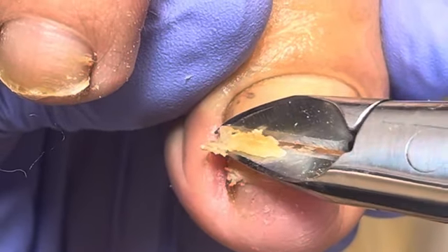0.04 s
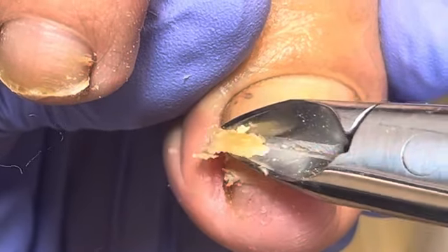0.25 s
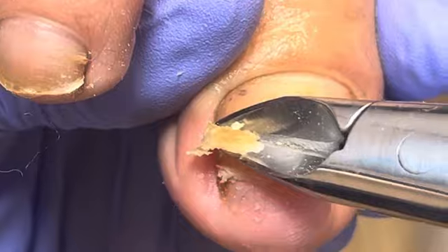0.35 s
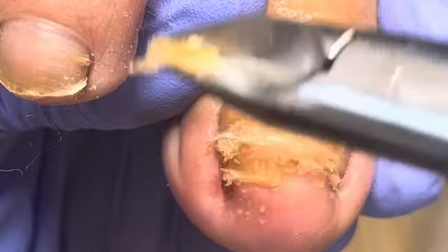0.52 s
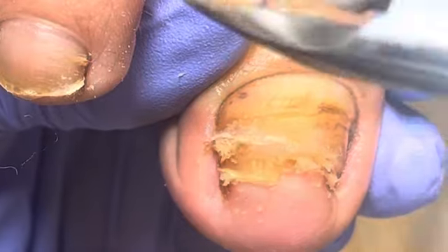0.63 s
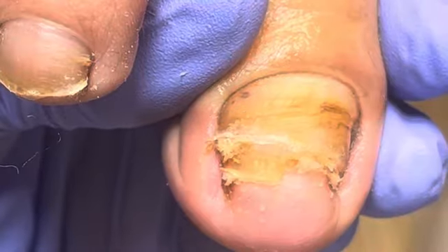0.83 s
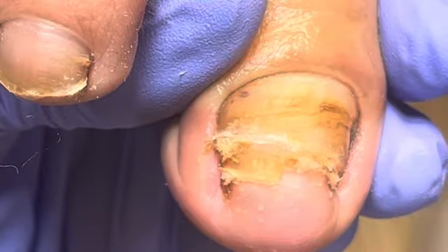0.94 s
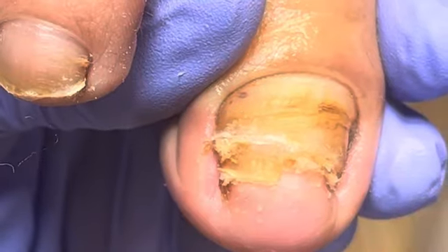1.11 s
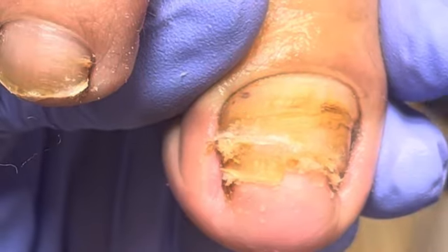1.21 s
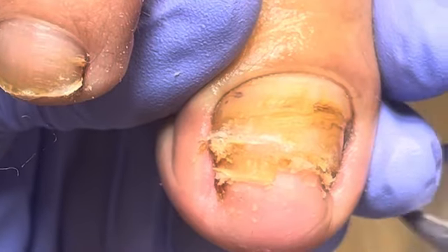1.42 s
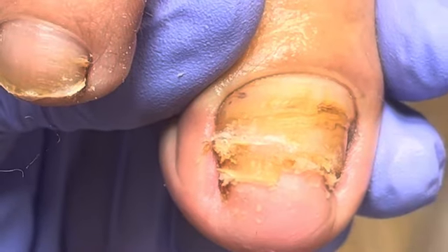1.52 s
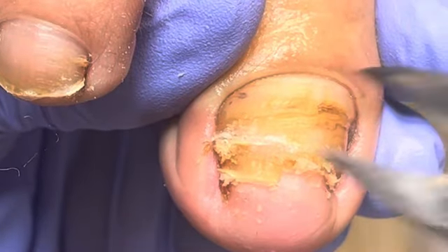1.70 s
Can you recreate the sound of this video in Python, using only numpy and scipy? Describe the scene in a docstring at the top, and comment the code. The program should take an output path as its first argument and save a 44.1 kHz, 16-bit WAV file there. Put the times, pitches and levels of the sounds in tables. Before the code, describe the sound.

A steel nail nipper snaps sharply through a thick toenail near the start, with a small dull thump and brief room echo; then only low rumble, thin hiss and faint rustles, close to a phone microphone.

```python
"""A small quiet room: a steel nipper snaps through a thick toenail a hand's width from a phone.
Cracks within about a millisecond ring the jaws as decaying sine modes, which near surfaces repeat.
A falling sine thumps through the toe, and decaying noise answers from the walls.
Underneath, shaped noise makes a low rumble, a thin hiss near 4 kHz and faint rustles, over wavering
low tones; the phone's stereo processing leaves the two channels different in phase and level."""
import sys
import numpy as np
from scipy import signal
from scipy.fft import rfft, irfft
from scipy.io import wavfile
from scipy.ndimage import uniform_filter1d

SR = 44100
rng = np.random.default_rng(int(sys.argv[2]) if len(sys.argv) > 2 else 0)


def pcm_store(signal):
    """Save signal as 16-bit PCM."""
    levels = np.round(np.clip(np.atleast_2d(signal), -1, 1) * 32767)
    wavfile.write(sys.argv[1], SR, levels.astype(np.int16).T)


def magnitude_from_level(level_db):
    """Linear magnitude for a level in decibels (20 dB per decade)."""
    exponent = np.asarray(level_db, float) / 20
    return 10 ** exponent


N = 77175
T = np.arange(N) / SR  # time [s]
F = np.fft.rfftfreq(N, 1 / SR) + 1e-3  # frequency [Hz], kept above zero for logarithms


def over_hz(table):
    """Spectral interpolation: an (f/Hz, value) table is read on a log-frequency axis."""
    hz, value = np.array(table, float).T
    return np.interp(np.log(F), np.log(hz), value)


def over_time(table):
    """Slow modulation: a (t/s, value) table is joined by straight lines in time."""
    return np.interp(T, *np.array(table).T)


def walk(rate_hz):
    """Band-limited random modulation: levels held 1 / rate_hz and slewed twice, spread near 1."""
    hold = int(SR / rate_hz)
    steps = np.repeat(rng.standard_normal(N // hold + 1), hold)
    slewed = uniform_filter1d(uniform_filter1d(steps, hold), hold)
    return 1.3 * slewed[:N]


def fade(start_s, t60_s, rise_s):
    """Exponential decay: rises after start_s while losing 60 dB every t60_s."""
    t = np.maximum(T - start_s, 0)
    return (1 - np.exp(-t / rise_s)) * magnitude_from_level(-60 * t / t60_s)


def swells(table):
    """Gaussian envelopes: bell-shaped swells with unequal rise and fall widths."""
    total = 0
    for peak_s, rise_s, fall_s, db in table:
        spread_s = np.where(T < peak_s, rise_s, fall_s)
        total = total + magnitude_from_level(db) * np.exp(-.5 * ((T - peak_s) / spread_s) ** 2)
    return total


def right_lag():
    """Interchannel phase: the angle in radians by which the right channel lags."""
    # phase difference from the phone's stereo processing: f/Hz, lag/rad
    lag_table = [(0, 0), (300, 0), (900, -1.1), (1800, 0), (2500, 2.5), (3800, .85), (5000, 1.5),
                 (5900, 3.1), (6900, 5.4), (7700, 6.3), (8900, 7.5), (9800, 9.4), (10500, 10.7),
                 (11800, 12.6), (14000, 15.7)]
    return np.interp(F, *np.array(lag_table).T)


def diffuse(colour, patchy_db=0., stepped=True):
    """Partial coherence: two-channel noise of joint rms 1; third-octave levels may be patchy in time."""
    # likeness of left and right: f/Hz, likeness (0-1)
    likeness_table = [(130, .993), (280, .9), (600, .25), (1200, .2), (1800, .85), (4000, .82), (5000, .8),
                      (5330, 1), (14000, 1)]
    # level of left over right: f/Hz, level/dB
    left_table = [(150, 0), (600, 2.5), (1400, 3.5), (2400, .5), (4000, 0)]
    # stepped treble phase, constant within each band: from f/Hz, to f/Hz, right lag/half turns
    treble_steps = [(5330, 6700, 1), (7200, 8900, 2), (9450, 10900, 3), (11600, 14000, 4)]
    shared, opposed = rfft(rng.standard_normal((2, N)))
    likeness = np.clip(over_hz(likeness_table), 0, 1)
    shared = np.sqrt(1 + likeness) * shared
    opposed = np.sqrt(1 - likeness) * opposed
    lag = right_lag()
    if stepped:
        for low_hz, high_hz, half_turns in treble_steps:
            lag[(F > low_hz) & (F < high_hz)] = np.pi * half_turns
    lean = magnitude_from_level(over_hz(left_table) / 2)  # half the difference goes to each side
    pair = np.array([lean, np.exp(-1j * lag) / lean])
    spectrum = magnitude_from_level(over_hz(colour)) * np.array([shared + opposed, shared - opposed]) * pair
    noise = irfft(spectrum, N)
    if patchy_db:
        third = np.clip(3 * np.log2(F / 150), 0, 20)  # third-octave position above 150 Hz
        noise = 0
        for k in range(21):
            one_band = irfft(spectrum * np.clip(1 - abs(third - k), 0, 1), N)
            noise = noise + one_band * magnitude_from_level(patchy_db * (k > 0) * walk(13))  # lowest band is steady
    return noise / np.sqrt(np.mean(noise ** 2))


def hum():
    """Frequency and amplitude modulation: low tones wander in pitch and surge together."""
    # tones: centre f/Hz, rms level before surges/dB, waver depth/dB
    tones = [(55.95, -57.5, -1), (67.6, -62.5, 1), (77.4, -58.5, 0.5), (105.7, -60, -1)]
    # uneven common surges: t/s, level change/dB
    surge_table = [(0, 0), (.24, 2), (.33, -9), (.4, 4), (.51, -8), (.77, 5.5), (.82, -6), (.85, 5),
                   (.88, -12.5), (.93, 1.5), (1.03, 3), (1.18, 5), (1.21, -6), (1.29, 4), (1.33, -5.5),
                   (1.37, 3.5), (1.43, -5), (1.5, 2.5), (1.75, 1)]
    surge_db = over_time(surge_table)
    total = 0
    for hz, db, waver_db in tones:
        loudness = np.sqrt(2) * magnitude_from_level(db + surge_db + waver_db * walk(6.4))
        wandering_hz = hz * (1 + .06 * walk(10))
        turns = rng.random() + np.cumsum(wandering_hz) / SR
        total = total + loudness * np.sin(2 * np.pi * turns)
    return total


def rumble():
    """Coloured noise: a rumble swells slowly, with the hum under it."""
    # room noise spectrum: f/Hz, relative density/dB per Hz
    room_colour = [(25, -13), (40, -5), (55, 2), (80, -3), (115, -1), (160, -5), (300, -13), (500, -23.5),
                   (1000, -27.5), (2200, -42.5), (4000, -40.5), (6500, -53.5), (8000, -50), (11500, -58),
                   (11900, -68.5)]
    # its slow course: t/s, rms level/dB
    room_course = [(0, -60.5), (.15, -56.5), (.3, -56.5), (.5, -57.5), (.7, -56.5), (.95, -56),
                   (1.1, -57.5), (1.3, -60), (1.45, -58.5), (1.55, -55.5), (1.75, -55)]
    # swells of the low middle: peak t/s, rise/s, fall/s, peak level/dB
    middle_swells = [(.1, 0.043, 0.092, -71), (1.52, 0.08, 0.12, -66.5)]
    # their spectrum: f/Hz, relative density/dB per Hz
    middle_colour = [(150, -19), (250, 4), (600, 3.5), (1100, -16), (2200, -11.5), (3000, -43.5)]
    room = magnitude_from_level(over_time(room_course)) * diffuse(room_colour, patchy_db=2)
    middle = swells(middle_swells) * diffuse(middle_colour)
    return room + middle + hum()


def hiss():
    """Band-limited noise: a thin hiss near 4 kHz swells slowly."""
    # spectrum: f/Hz, relative density/dB per Hz
    hiss_colour = [(2200, -20.5), (3200, 1.5), (4500, 4.5), (5300, 2.5), (5900, -11.5), (6500, -35)]
    # slow course: t/s, rms level/dB
    hiss_course = [(0, -66), (.18, -63.5), (.4, -67), (.55, -63.5), (.65, -65), (.76, -60.5), (.9, -70),
                   (1, -64.5), (1.16, -63), (1.32, -67.5), (1.5, -62.5), (1.75, -62.5)]
    return magnitude_from_level(over_time(hiss_course)) * diffuse(hiss_colour, patchy_db=2)


def rustles():
    """Amplitude-modulated noise: soft grainy swells, each with its own share of treble."""
    # events: peak t/s, rise/s, fall/s, body level before grain/dB, treble over body/dB
    rustle_events = [(0.059, 0.3, 0.11, -72, -20.5), (0.469, .05, 0.075, -78, -13),
                     (0.602, 0.039, 0.042, -71, 0), (0.769, 0.045, 0.064, -74.5, -7.5),
                     (.9, 0.067, 0.089, -74, 2.5), (1.272, 0.005, 0.024, -83, 6.5),
                     (1.382, 0.026, 0.042, -66, 0.5), (1.455, 0.019, 0.018, -65, -0.5)]
    # body spectrum: f/Hz, relative density/dB per Hz
    body_colour = [(300, -4.5), (800, -0.5), (1800, -2), (2150, 1), (2500, -2.5), (3500, -7.5),
                   (6000, -29.5)]
    # treble spectrum: f/Hz, relative density/dB per Hz
    treble_colour = [(2500, -17), (4500, 5), (6500, -10), (8500, -7), (11500, -10.5), (11900, -26)]
    body_swells = [row[:4] for row in rustle_events]
    treble_swells = [(s, rise, fall, db + treble_db) for s, rise, fall, db, treble_db in rustle_events]
    body = swells(body_swells) * diffuse(body_colour)
    treble = swells(treble_swells) * diffuse(treble_colour)
    grain = magnitude_from_level(2 * walk(150))
    return grain * (body + treble)


def walls():
    """Reverberation: a quick dense scatter, then the slower exponential decay of the room."""
    # colour of the reverberation: f/Hz, relative density/dB per Hz
    tail_colour = [(200, 7), (1000, -6.5), (1400, -8), (1900, 3), (2500, 0.5), (3400, -4), (4200, 4.5),
                   (5200, -1), (6500, 2), (8300, -4.5), (9500, -14.5), (11500, -18), (11900, -36)]
    start_s, rise_s = .2022, .001
    early = magnitude_from_level(-41) * fade(start_s, .047, rise_s) * diffuse(tail_colour, stepped=False)
    late = magnitude_from_level(-49.5) * fade(start_s, .65, rise_s) * diffuse(tail_colour, patchy_db=2)
    return early + late


def thump():
    """Dispersion: the blow travels through toe and hand, highs first and lows late."""
    start_s, rise_s, t60_s = .2015, .003, .038
    top_hz, end_hz, sag_s = 450, 80, .006  # pitch sags exponentially from top to end
    t = np.maximum(T - start_s, 0)
    turns = end_hz * t + (top_hz - end_hz) * sag_s * (1 - np.exp(-t / sag_s))
    envelope = fade(start_s, t60_s, rise_s) * (1 - np.exp(-t / rise_s))  # the rise acts twice
    return -magnitude_from_level(-21.5) * envelope * np.sin(2 * np.pi * turns)


def snap():
    """Modal excitation: cracks ring the jaws until they shut; near surfaces add delayed copies."""
    # cracks of the nail and closing of the jaws: t/s, relative level/dB, brightness/dB per octave
    cracks = [(.19971, -22, 11), (.20001, -5, .6), (.2004, -17.3, -11), (.20077, -20, 0)]
    # jaw modes: f/Hz, relative level/dB, time to fall 60 dB/s
    jaw_modes = [(1820, -24, 0.0094), (2460, -22, .0033), (3730, -5.5, .007), (4250, -1, 0.0062),
                 (4473, -0.5, .008), (6070, -13, .0129), (7320, -18, .0078), (8390, -2.5, .0048),
                 (9590, -13.5, .0057), (11200, -11, 0.0044), (6690, -24.5, 0.016), (7126, -28.5, .04),
                 (11330, -37, .05), (10400, -19.5, .006), (4957, -17, .006), (1000, -35, 0.0038)]
    # near surfaces: delay/s, level before colour/dB, extra delay on the right/s
    near_echoes = [(.0037, -18.5, 0), (.0060, -26, .0001), (.0093, -23, 0), (0.014, -34, -.0001)]
    # colour of these echoes: f/Hz, level/dB
    echo_colour = [(1000, -2.5), (4300, -1.5), (6500, 3), (8500, -2), (9300, -8), (11500, -5)]
    ring = np.zeros(N)
    for crack_s, crack_db, tilt_db in cracks:
        t = np.maximum(T - crack_s, 0)
        for k, (hz, mode_db, t60_s) in enumerate(jaw_modes):
            sign = (-1) ** k  # neighbouring rows start in opposite phase
            gain = sign * magnitude_from_level(crack_db + mode_db + tilt_db * np.log2(hz / 6000))
            ring += gain * np.sin(2 * np.pi * hz * t) * fade(crack_s, t60_s, .00013)
    # the jaws meet and choke their ring, from -3 dB to -9 dB
    since_shut = np.maximum(T - .2016, 0)
    ring = ring * magnitude_from_level(-6 * (1.5 - np.exp(-since_shut / .0003)))
    echo = 0
    for delay_s, db, late_s in near_echoes:
        delays = np.array([[delay_s], [delay_s + late_s]])
        echo = echo + magnitude_from_level(db) * np.exp(-2j * np.pi * F * delays)
    right = magnitude_from_level(1) * np.exp(-1j * right_lag())  # 1 dB louder than the left
    pair = np.array([np.ones(len(F)), right])
    return irfft(rfft(ring) * pair * (1 + magnitude_from_level(over_hz(echo_colour)) * echo), N)


def scene():
    """Superposition: all sources add in the two channels."""
    return rumble() + hiss() + rustles() + walls() + thump() + snap()


def top_cut(x):
    """Nothing passes above the cut-off."""
    return signal.sosfilt(signal.butter(12, 13450, fs=SR, output="sos"), x)


def record(dry):
    """Band-pass filtering: the phone cuts the lowest bass and the top."""
    top_hz, bass_hz = 12250, 33
    band = 1 / np.sqrt((1 + (F / top_hz) ** 150) * (1 + (bass_hz / F) ** 4))
    mix = irfft(rfft(dry) * band, N)
    return top_cut(mix)


dry = scene()
out = record(dry)
pcm_store(out)
```